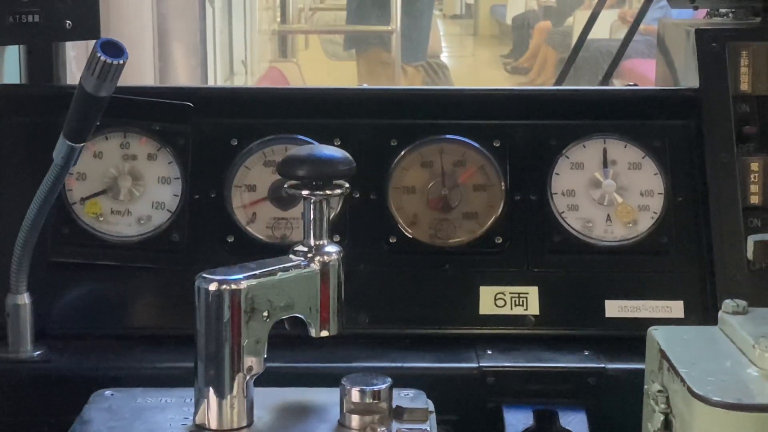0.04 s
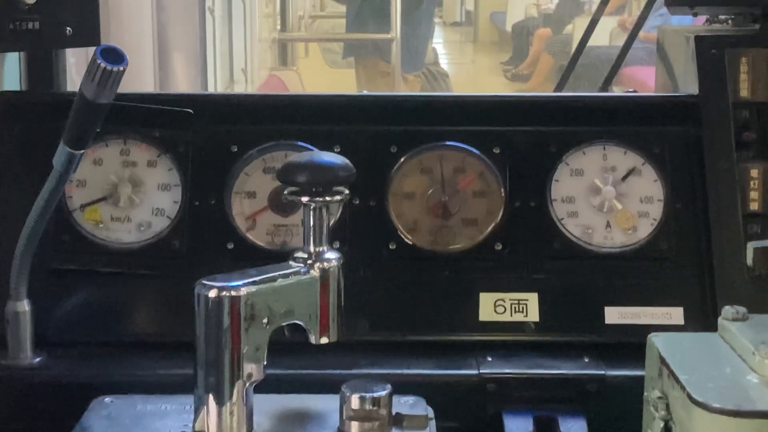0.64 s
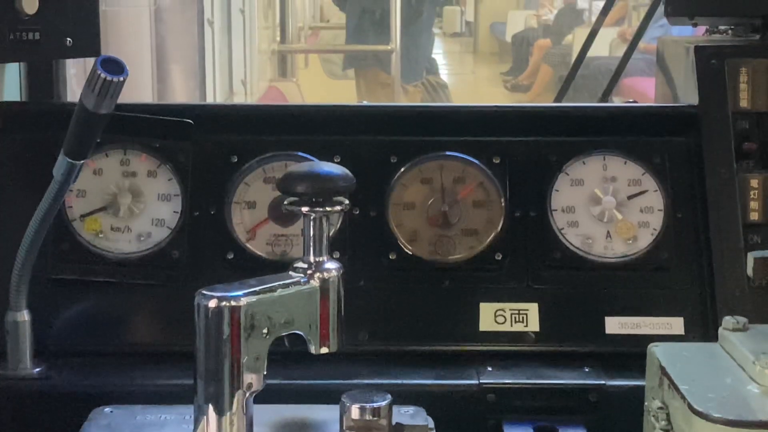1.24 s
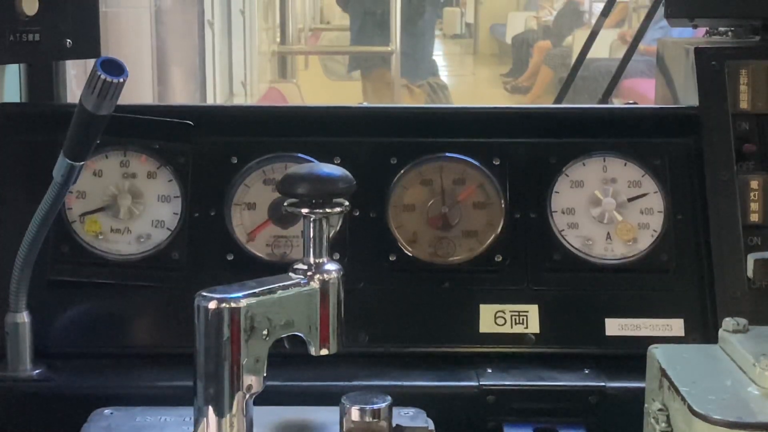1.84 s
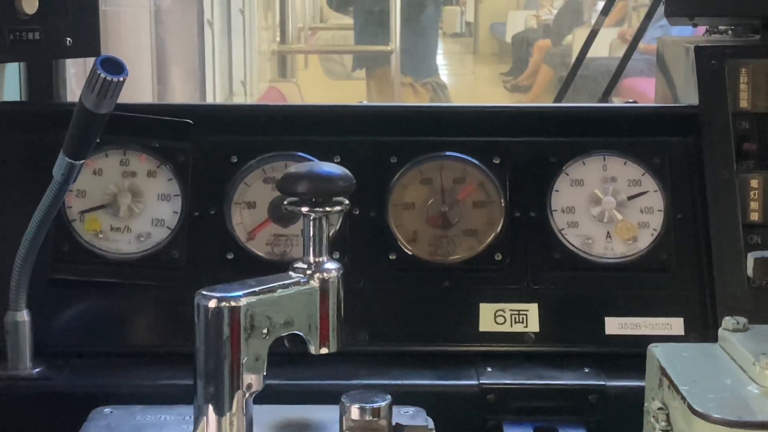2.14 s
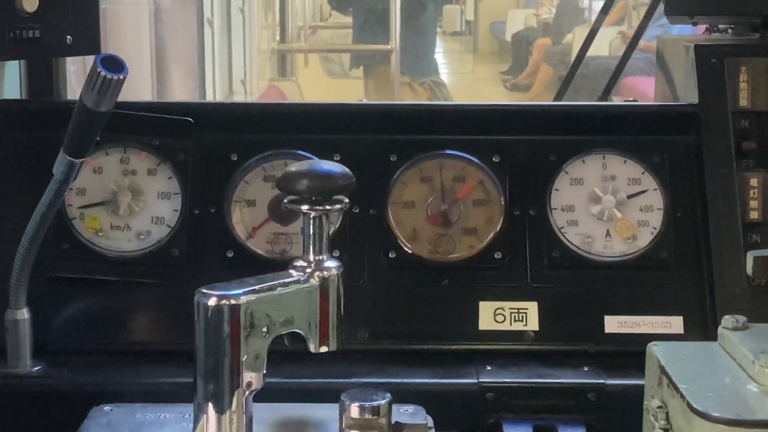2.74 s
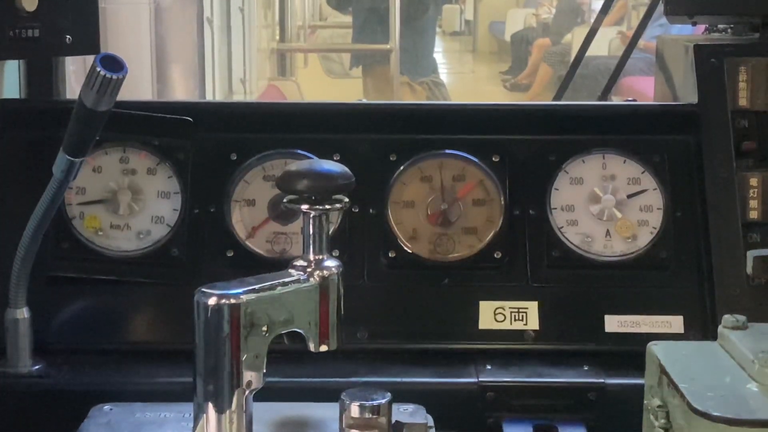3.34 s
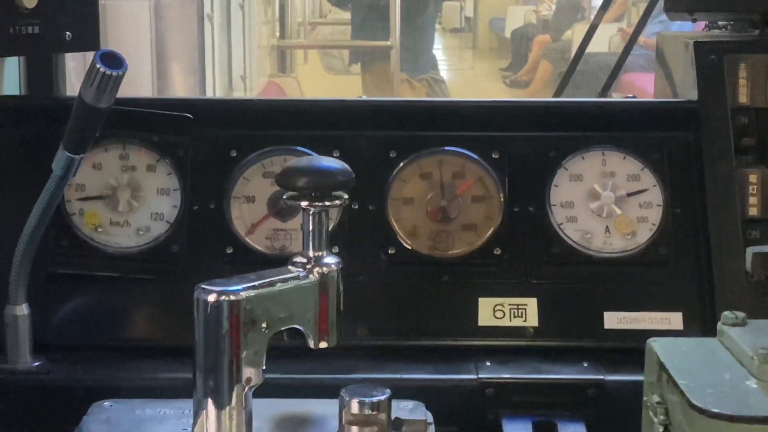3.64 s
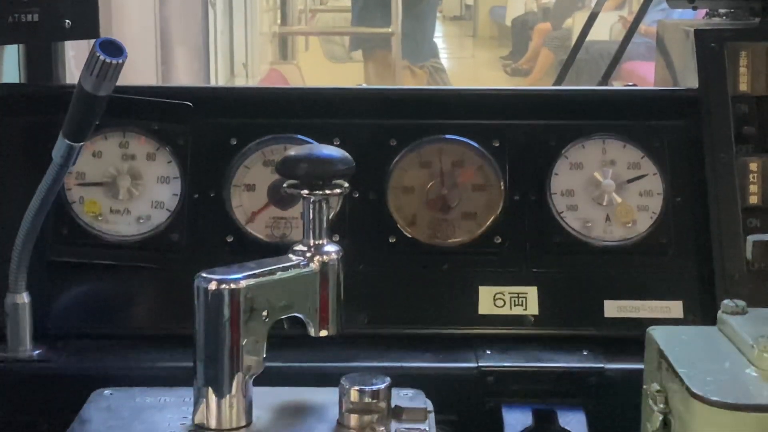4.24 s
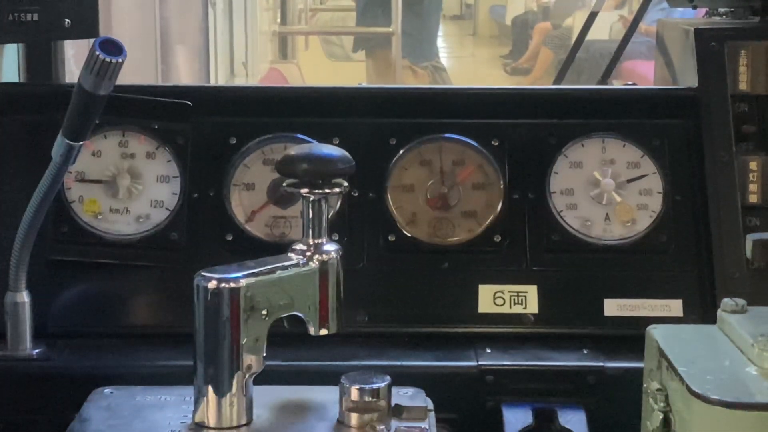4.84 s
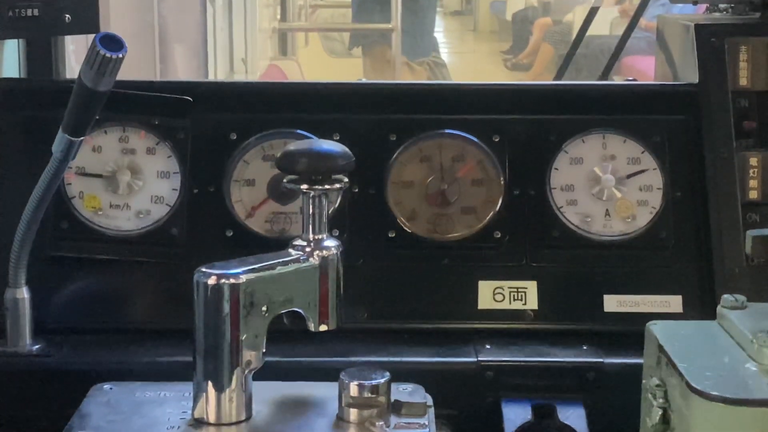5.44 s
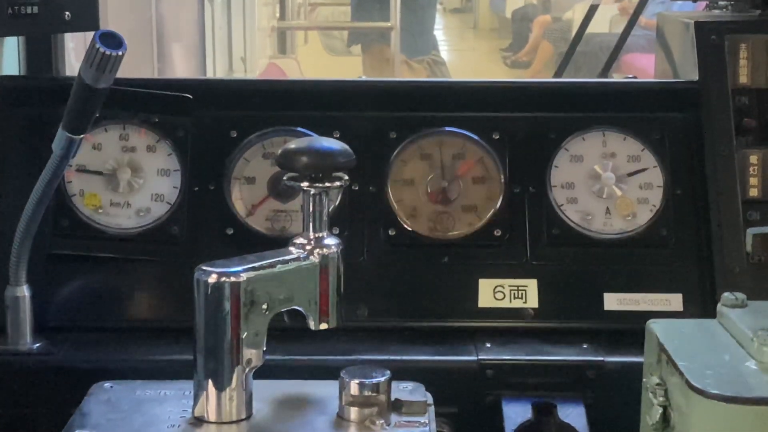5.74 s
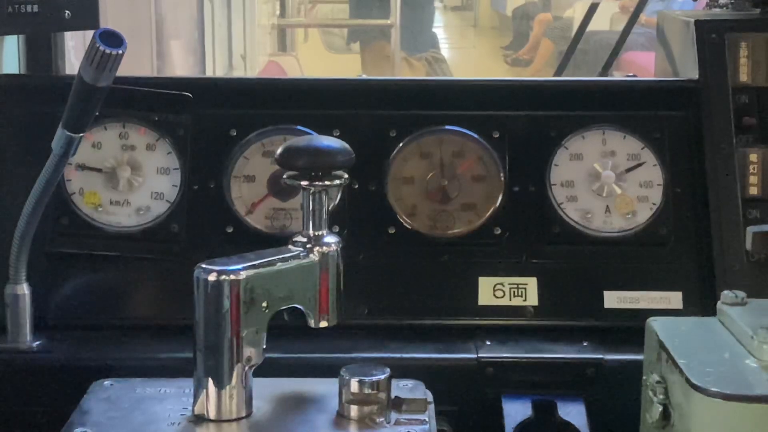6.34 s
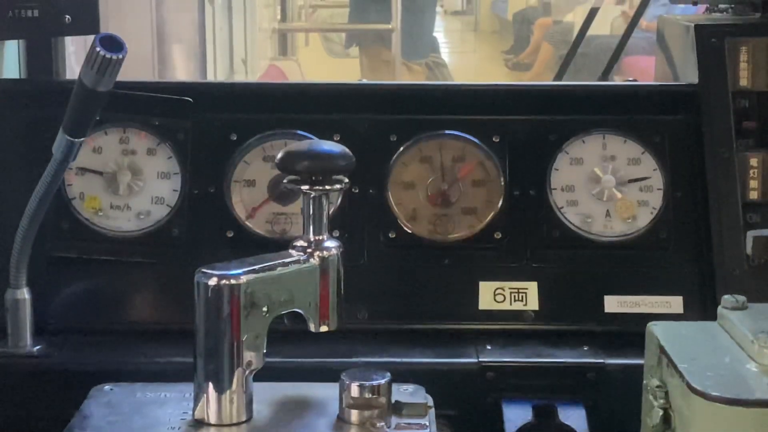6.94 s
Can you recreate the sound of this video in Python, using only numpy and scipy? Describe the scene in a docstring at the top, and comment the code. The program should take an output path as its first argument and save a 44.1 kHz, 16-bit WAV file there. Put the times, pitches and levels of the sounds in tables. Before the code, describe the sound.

An electric train gathers speed, heard inside the driver's cab. A deep rumble, wheel roar, machine hum and thin, nearly steady whine run throughout. At first brake air fades, the control lever clicks and the couplings jolt with low booms and a dull clatter. Later a faint gear note climbs in pitch, wheels knock over rail joints three times, one wheel chirps briefly, and a valve lets out a soft puff of air.

```python
"""In the driver's cab of an electric train that gathers speed.
The body rumbles and the wheels roar under a machine's hum and a thin whine; both sag twice in pitch
with their power supply. Brake air fades, the controller clicks, valves puff and the couplings jolt.
The gears sing a slowly rising note, wheels knock over rail joints and a wheel's rim chirps on the rail."""
import sys
import numpy as np
from scipy import signal
from scipy.fft import rfft, irfft
from scipy.io import wavfile
from scipy.ndimage import uniform_filter1d

SR = 44100
rng = np.random.default_rng(int(sys.argv[2]) if len(sys.argv) > 2 else 0)


def store_wav(level_fs):
    """Save 16-bit WAV to argv[1]."""
    pcm = np.round(np.clip(np.atleast_2d(level_fs), -1, 1) * 32767)
    wavfile.write(sys.argv[1], SR, pcm.T.astype(np.int16))


N = 312669
T = np.arange(N) / SR
HZ = np.fft.rfftfreq(N, 1 / SR)


def amp(db):
    """Turns decibels into a gain to multiply by."""
    return 10 ** (np.asarray(db) / 20)

def unit(x):
    """Scales a signal to an average strength (rms) of one."""
    return x / np.sqrt(np.mean(x ** 2) + 1e-20)

def curve(rows, column=1):
    """Joins the points of a time table with straight lines."""
    rows = np.array(rows, float)
    return np.interp(T, rows[:, 0], rows[:, column])

def shape(points):
    """Joins the points of a frequency table, giving each octave equal room."""
    f, value = np.transpose(points)
    return np.interp(np.log(HZ + 1), np.log(f + 1), value)

def spectrum(points):
    """A gain for each frequency, falling steeply beyond the table's ends."""
    lowest_hz, highest_hz = points[0][0], points[-1][0]
    return amp(shape(points)) / (1 + (HZ / highest_hz) ** 4) / (1 + (lowest_hz / (HZ + 1)) ** 4)

def resonance(hz, width_hz):
    """A peak around a frequency at which something likes to ring."""
    return 1 / (1 + (2 * (HZ - hz) / width_hz) ** 2)

def drift(rate_hz):
    """A smooth random wobble of strength one."""
    return unit(irfft(rfft(rng.standard_normal(N)) / (1 + (HZ / rate_hz) ** 4), N))

def swell(depth_db, rate_hz):
    """A gain that wanders at random."""
    return amp(depth_db * drift(rate_hz))

def burst(start, attack_s, t60, hold_s=0):
    """A gain that rises, holds, then fades by 60 dB in t60 seconds (the fade time)."""
    age = T - start
    rise = np.clip(age / attack_s, 0, 1)
    return rise * np.exp(-np.log(1000) * np.maximum(age - attack_s - hold_s, 0) / t60)

def angle(hz):
    """The growing angle whose sine is a tone of the given pitch."""
    return 2 * np.pi * (np.cumsum(hz) / SR + rng.random())

def steadied(x, share, span_s):
    """Evens out the slow swells of a noise; a share of 1 evens them most."""
    power = uniform_filter1d((x ** 2).mean(0), max(int(span_s * SR), 2))
    return unit(x / uniform_filter1d(power, SR // 50) ** (np.clip(share, 0, 1) / 2))

# sound that reaches both ears together: f/Hz, share
SHARED_SOUND = [(100, 1), (150, 0.92), (210, 0.97), (300, 0.56), (400, 0.57), (520, 0), (750, 0.16),
                (1100, 0)]
# how much of the treble is alike on both sides, a little later on the left: f/Hz, share
LATE_SOUND = [(600, 0), (1200, 0.99), (1600, 0), (2200, 0.73), (3600, 0.15), (5800, 0.031), (7200, 1)]
# how much louder the left side is: f/Hz, level/dB
LEFT_LEAN = [(60, -3.5), (120, 1.5), (230, -1), (440, 1), (850, -0.5), (1650, 1.5), (3200, 3), (6200, 0.5),
             (12000, -0.5)]
def noise(gain):
    """Stereo noise: alike on both sides in the bass; higher up, partly alike, with the left side a little
    behind the right."""
    source, other = rfft(rng.standard_normal((2, N)))
    lag_s = 12 / SR
    alike = shape(SHARED_SOUND) + shape(LATE_SOUND) * np.exp(-2j * np.pi * HZ * lag_s)
    alike = alike / np.maximum(abs(alike) / .995, 1)
    left = alike * source + np.sqrt(1 - abs(alike) ** 2) * other
    lean = amp(shape(LEFT_LEAN) / 2)
    return unit(irfft(np.array([left * lean, source / lean]) * gain, N))


# frequencies that the cab boosts: f/Hz, width/Hz, boost/dB
CAB_RESONANCES = [(66, 8, 3), (94, 7, 6), (124, 6, 3), (176, 12, 3), (198, 14, 3), (277, 12, 4),
                  (303, 16, 3), (343, 16, 4), (366, 20, 3), (400, 22, 4), (468, 28, 5), (520, 24, 3),
                  (702, 22, 4), (745, 30, 3), (808, 20, 3), (915, 50, 3), (1215, 30, 3), (1400, 70, 2),
                  (1555, 50, 3), (2030, 40, 5), (2480, 90, 2), (2740, 70, 3), (2930, 90, 4), (3350, 130, 3),
                  (4050, 160, 2), (4600, 140, 2), (5750, 220, 2), (6520, 120, 3), (7330, 200, 2)]
# tone colours of the body, panels, wheels, their rolling faces and the rails: f/Hz, level/dB
BODY_COLOUR = [(12, -25), (22, -24), (32, -12), (45, -8.5), (57, 0.5), (68, 1.5), (84, -4.5), (98, 0),
               (125, -12.5), (180, -29)]
PANEL_COLOUR = [(90, -11), (112, 3.5), (135, 3), (160, 0), (180, 3), (200, -3), (235, -9), (300, -10),
                (420, -17)]
ROAR_COLOUR = [(150, -5.5), (240, 6), (300, 3.5), (390, 3.5), (450, -1), (560, 0), (720, -1), (800, -6),
               (1000, -7), (1200, -8.5), (1550, -10), (1950, -11), (2250, -25.5), (3500, -65)]
TREAD_COLOUR = [(250, -18.5), (340, 3.5), (480, -2.5), (600, -8.5), (900, -15), (1200, -18.5)]
HISS_COLOUR = [(1400, -7), (2200, 6), (2900, 2), (3200, -0.5), (3700, 0), (4300, -2), (5000, -1.5),
               (5600, -5.5)]
FIZZ_COLOUR = [(6000, 1), (7300, 3.5), (8400, 0), (9600, 2), (11000, -3.5), (12500, -2), (14000, -16.5)]
# loudness of the body's shaking and of the wheels' rolling faces: t/s, level/dB
BODY_LEVELS = [(0, -30), (.3, -28), (.45, -22), (.75, -23), (1.15, -28.5), (1.4, -30), (1.9, -35.5),
               (3.1, -25.5), (3.4, -24), (4.8, -21.5), (5.15, -25.5), (6, -21.5), (6.45, -24), (7.09, -24)]
TREAD_LEVELS = [(0, -41.5), (1.6, -72), (2.4, -34), (3.5, -34), (4.5, -35), (5.8, -36), (7.09, -40.5)]
# loudness along the ride: t/s, panel drone/dB, wheel roar/dB, rail hiss/dB
RIDE_LEVELS = [(0, -29.5, -28.5, -46), (.5, -24, -28.5, -47), (1.3, -27.5, -29, -47),
               (2, -24.5, -29.5, -49), (3.2, -28, -30.5, -48.5), (4.5, -25, -29.5, -47.5),
               (5.3, -25, -30, -47.5), (6.3, -25, -29.5, -46.5), (6.85, -26, -28.5, -47.5),
               (7.09, -21, -28, -45)]
def running_noise():
    """The body rumbles, panels drone, wheels roar and rails hiss, all coloured by the cab."""
    cab = amp(sum(db * resonance(hz, width) for hz, width, db in CAB_RESONANCES))
    drone_db, roar_db, hiss_db = (curve(RIDE_LEVELS, column) for column in (1, 2, 3))
    rumble = steadied(noise(spectrum(BODY_COLOUR) * cab), share=.75, span_s=.13)
    rumble *= amp(curve(BODY_LEVELS)) * swell(depth_db=1.56, rate_hz=3.5)
    drone = steadied(noise(spectrum(PANEL_COLOUR) * cab), share=1, span_s=.25)
    drone *= amp(drone_db) * swell(.2, 5.3)
    roar_flutter, hiss_flutter = swell(.6, 12), swell(.5, 20)
    roar = noise(spectrum(ROAR_COLOUR) * cab) * amp(roar_db) * roar_flutter
    tread = noise(spectrum(TREAD_COLOUR) * cab) * amp(curve(TREAD_LEVELS)) * swell(1, 6.8)
    hiss = noise(spectrum(HISS_COLOUR) * cab) * amp(hiss_db) * hiss_flutter
    fizz = noise(spectrum(FIZZ_COLOUR) * cab) * amp(hiss_db - 12) * swell(.8, 14)
    return rumble + drone + roar + tread + hiss + fizz

# notes of the pipe that lets out the brake air: f/Hz, width/Hz, level/dB
PIPE_RESONANCES = [(2030, 160, 8), (3350, 200, -2), (4000, 260, 1), (4430, 280, -1), (5750, 300, -7),
                   (6530, 150, -4), (8800, 700, -12)]
def brake_air():
    """Air whistles out through a pipe and dies away."""
    pipe = noise(sum(amp(db) * resonance(hz, width) for hz, width, db in PIPE_RESONANCES))
    return amp(-51.5) * burst(0, attack_s=1 / SR, t60=1.6, hold_s=.39) * pipe

# puffs of air: t/s, level/dB, rise time/s, fade time/s
VALVE_PUFFS = [(1.17, -52, .17, 0.99), (6.655, -45, 0.018, 0.57)]
# tone colour of escaping air: f/Hz, level/dB
AIR_COLOUR = [(2000, -11), (3200, 12), (4500, 7), (7500, -1.5), (11500, -3), (15000, -22)]
def valves():
    """Twice a valve lets out a little hissing air."""
    flow = sum(amp(db) * burst(start, attack, t60) for start, db, attack, t60 in VALVE_PUFFS)
    return noise(spectrum(AIR_COLOUR)) * flow

# the short tones that make up a click: f/Hz, level/dB, fade time/s
CLICK_TONES = [(2890, 4, .015), (3800, 1, .01), (5300, -9, .007), (6850, -11, .006), (8800, -10, .006),
               (11900, -6, .0076), (14700, -6, .007)]
def controller():
    """The driver's lever clicks into a notch, a little to the right."""
    age = np.maximum(T - .4283, 0)
    click = sum(amp(db - 60 * age / t60) * np.sin(2 * np.pi * hz * age) for hz, db, t60 in CLICK_TONES)
    return amp(-33) * click * amp([[-1.5], [1.5]])

# steady tones of fans and electrics: f/Hz, width/Hz, level/dB
FAN_TONES = [(76.5, 4, -33), (152, 5, -41), (300.7, 8, -45), (361, 4, -38), (600, 3, -50), (664, 6, -52),
             (866, 4, -55), (1083, 6, -61)]
# tone from the ripple in the motors' current: t/s, level/dB
RIPPLE_LEVELS = [(0, -65), (.75, -38), (1.7, -44.5), (2.3, -38), (2.8, -36.5), (3.1, -47), (4.5, -40.5),
                 (5.1, -49.5), (7.09, -41.5)]
def fans_and_motors():
    """Fans and motors buzz at pitches that stay put, each a narrow band of noise."""
    fans = sum(amp(db) * steadied(noise(resonance(hz, width) ** 2), share=.61, span_s=.26)
               for hz, width, db in FAN_TONES)
    ripple = steadied(noise(resonance(hz=722, width_hz=9.6)), share=.56, span_s=.19)
    return fans + amp(curve(RIPPLE_LEVELS)) * ripple

# pitch of the whine, sagging and recovering with the power supply: t/s, f/Hz
WHINE_PITCH = [(0, 1783), (.28, 1782), (.4, 1770), (.7, 1761), (.9, 1771), (1.3, 1781), (1.7, 1776),
               (3.2, 1775.5), (3.6, 1773), (4.15, 1779), (5.15, 1775), (6.05, 1777), (6.33, 1755),
               (6.55, 1748), (6.77, 1757), (7.09, 1781)]
# swells and brief dips of the whine: t/s, level/dB
WHINE_LEVELS = [(0, -.3), (.29, 0), (.355, -7), (.41, 1), (.47, 1), (.52, -5), (.6, -.5), (.73, -2),
                (.82, -5), (.91, 1), (1.2, -1.5), (1.4, .7), (2.1, .8), (2.3, -2.5), (2.5, -3.5),
                (2.65, -1), (2.8, 1.8), (3.3, -.7), (3.4, -3.5), (3.52, 1.3), (3.93, -.7), (4.05, 1.7),
                (4.3, 1.5), (4.65, -.3), (5.06, 1), (5.12, -4), (5.27, -.7), (5.45, -1.3), (6.05, 0),
                (6.15, -1), (6.4, 0), (6.78, .5), (6.9, -1.5), (7.09, -2.5)]
# the cab's pattern of loud and quiet spots (a standing wave): f/Hz, left/dB, right/dB, left lead/rad
STANDING_WAVE = [(1748, -34, -35, -1.1), (1762, -39, -39, 1.6), (1766, -41, -41, 2.3),
                 (1773, -35, -34.5, 3.8), (1776, -35, -37, 4.2), (1780, -32.5, -42, 4.3),
                 (1783, -31.5, -37.5, 5.3)]
def whine():
    """A thin tone, rougher after each jolt; its pitch moves the loud and quiet spots in the cab."""
    hz = curve(WHINE_PITCH)
    pitches, *columns = np.transpose(STANDING_WAVE)
    left_db, right_db, lead = (np.interp(hz, pitches, column) for column in columns)
    turn = angle(hz) + .12 * drift(25)
    shake = np.max([burst(start, JOLT_RISE_S, t60=1.1) for start, *_ in COUPLING_JOLTS], axis=0)
    # the wave between the two sides wanders slowly
    left = amp(left_db) * swell(.95, 15) * np.sin(turn + lead + .2 * drift(5))
    right = amp(right_db) * swell(.95, 15) * np.sin(turn)
    # the shaking cab scatters a little of the tone
    scatter = np.array([drift(50) * np.sin(turn) + drift(50) * np.cos(turn) for side in range(2)])
    level = amp(curve(WHINE_LEVELS)) * swell(depth_db=2.2 * shake, rate_hz=34)
    return level * (np.sqrt(2) * np.array([left, right]) + amp(-51) * (1 + 2 * shake) * scatter)

def shaft_speed():
    """Turns per second: the heavy shaft follows the same supply dips as the whine, but late."""
    normal_shaft_hz, normal_whine_hz, lag_s = 57.8, 1776, .29
    sag = curve(WHINE_PITCH) / normal_whine_hz - 1
    memory = np.exp(-1 / (lag_s * SR))
    return normal_shaft_hz * (1 + signal.lfilter([1 - memory], [1, -memory], sag))

# the main hum, at twice the shaft speed: t/s, level/dB
HUM_LEVELS = [(0, -25), (.5, -26.5), (1.05, -25), (1.3, -29.5), (1.8, -23), (2.25, -25), (2.8, -19),
              (3.8, -25), (4.15, -26.5), (4.8, -27.5), (5.1, -22.5), (5.55, -29), (5.8, -18.5),
              (6.1, -21.5), (6.35, -15), (7.09, -25.5)]
# weaker tones of the shaft: multiple of its speed, start level/dB, end level/dB
SHAFT_TONES = [(1, -43, -33), (3, -34.5, -37), (4, -50, -55)]
def machine_hum():
    """A spinning helper machine shakes the cab at multiples of its shaft speed."""
    turn = angle(shaft_speed())
    hum = amp(curve(HUM_LEVELS)) * swell(.66, 5.8) * np.sin(2 * turn + .13 * drift(3.1))
    for multiple, start_db, end_db in SHAFT_TONES:
        level = amp(np.linspace(start_db, end_db, N)) * swell(2.5, 8.7)
        hum += level * np.sin(multiple * turn + .54 * drift(4.4))
    return np.sqrt(2) * hum * amp([[-.5], [.5]])

# notes of a wheel: f/Hz, width/Hz, level/dB
WHEEL_RESONANCES = [(1570, 220, 11), (2900, 500, -4.5)]
def wheel_ring():
    """A wheel rings when it is shaken at random."""
    return noise(sum(amp(db) * resonance(hz, width) for hz, width, db in WHEEL_RESONANCES))

# slips of the wheel's guiding rim (the flange): t/s, level/dB, hold time/s, f/Hz
FLANGE_SLIPS = [(4.45, -48, 0.12, 1535), (4.581, -34, .025, 1502), (4.634, -41, 0.044, 1536)]
def flange_chirp():
    """The rim rasps along the rail, shakes the wheel and briefly catches in a wavering squeal."""
    rasp, squeal = np.zeros((2, N))
    for start, db, hold_s, hz in FLANGE_SLIPS:
        rub = amp(db) * burst(start, attack_s=.0093, t60=.23, hold_s=hold_s)
        turn = angle(hz + 22.1 * drift(60))
        rasp = np.maximum(rasp, rub)
        squeal += rub * (np.sin(turn) + amp(-11) * np.sin(2 * turn))
    return wheel_ring() * rasp + amp(-1.5) * squeal

# wheels hitting joints in the rail: t/s, clank/dB, thud/dB, clank fade time/s
JOINT_HITS = [(3.539, -36.5, -46, 0.27), (3.571, -47.5, -40, 0.3), (4.425, -38.5, -34, 0.71),
              (4.593, -40, -17, 0.32), (6.455, -42, -27, .3), (6.483, -24, -28, 0.25),
              (6.535, -40, -34, .26), (6.61, -52, -19.5, 0.3)]
# tone colours of the clank and the thud: f/Hz, level/dB
CLANK_COLOUR = [(150, -10), (240, 5), (310, 13), (420, -1), (624, 1), (750, -2), (900, 1.5), (1060, 1),
                (1250, -2.5), (1560, 3), (1800, -1.5), (2010, 0), (2200, -10), (2750, -9.5), (2900, -7.5),
                (3100, -14), (3380, -13.5), (3700, -19), (4300, -21.5), (6000, -31), (10000, -45)]
THUD_COLOUR = [(24, -13), (40, -14), (62, 3), (85, -9), (140, 1), (300, -40), (800, -57)]
# notes of loose parts on the frame that holds the wheels: f/Hz, width/Hz, boost/dB
FRAME_RESONANCES = [(1620, 60, 4), (2010, 50, 3), (2540, 60, 3), (2930, 70, 4)]
def rail_joints():
    """A wheel drops into a joint with a dull thud; it rings, and its frame clanks and rattles on."""
    rise_s = .018
    clank, thud = np.zeros((2, N))
    for start, clank_db, thud_db, t60 in JOINT_HITS:
        lingering = amp(-8) * burst(start, rise_s, t60=.67)
        clank += amp(clank_db) * (burst(start, rise_s, t60) + lingering)
        thud += amp(thud_db) * burst(start, rise_s, t60=.48)
    frame = amp(sum(db * resonance(hz, width) for hz, width, db in FRAME_RESONANCES))
    rattle = noise(spectrum(CLANK_COLOUR) * frame) * swell(depth_db=1.8, rate_hz=70)
    metal = rattle + amp(-7) * wheel_ring()
    bass = steadied(noise(spectrum(THUD_COLOUR)), share=.98, span_s=.023)
    return clank * metal + thud * bass

JOLT_RISE_S = .02
# jolts of the links between cars: t/s, clatter/dB, boom/dB, boom f/Hz, clatter fade time/s
COUPLING_JOLTS = [(.385, -58, -21, 89, .3), (.53, -31.5, -14.5, 58, 0.36), (.64, -40, -11.5, 66, .79),
                  (.72, -36, -19, 62, .7), (.85, -56, -18.5, 72, .5), (.92, -44, -23, 44, .4),
                  (1.085, -42, -22.5, 105, .25), (1.14, -54, -16, 58, .3)]
# tone colour of their dull clatter: f/Hz, level/dB
CLATTER_COLOUR = [(300, -15), (600, 2), (850, -4), (1150, 2), (1450, -7), (1900, -6), (2300, -16),
                  (3000, -14.5), (5000, -32)]
def couplings():
    """As the motors start to pull, the links between the cars clatter and the body booms."""
    clatter, boom = np.zeros((2, N))
    for start, clatter_db, boom_db, hz, t60 in COUPLING_JOLTS:
        clatter += amp(clatter_db) * burst(start, JOLT_RISE_S, t60)
        body_tone = np.sin(angle(hz + 3 * drift(8.9)))
        boom += amp(boom_db) * burst(start, attack_s=.057, t60=.5) * body_tone
    return clatter * noise(spectrum(CLATTER_COLOUR)) * swell(depth_db=1.5, rate_hz=56) + boom

# pitch of the gear teeth meeting, rising with the speed: t/s, f/Hz
GEAR_PITCH = [(0, 90), (3.5, 245), (4.3, 305), (4.75, 345), (5.1, 375), (5.45, 398), (5.65, 417), (6, 444),
              (6.45, 470), (7.09, 515)]
# moments when the car rings along with the gears: t/s, length/s, level/dB
GEAR_SWELLS = [(4.3, .18, -34), (4.76, .18, -31.5), (5.11, .16, -31), (5.45, .26, -34.5), (5.7, .26, -34),
               (5.97, .18, -36)]
def gears():
    """The gear teeth sing a climbing note that swells and fades on its way up."""
    turn = angle(curve(GEAR_PITCH)) + .4 * drift(7)
    note = np.array([swell(2, 14) * np.sin(turn + .4 * drift(12)) for side in range(2)])
    swells = sum(amp(db) * np.exp(-(2 * (T - peak) / length) ** 2) for peak, length, db in GEAR_SWELLS)
    return np.sqrt(2) * (amp(-45) + swells) * note


def scene():
    """Everything that is heard in the cab: the lasting sounds plus the short ones."""
    lasting = running_noise() + machine_hum() + whine() + fans_and_motors() + gears()
    return lasting + couplings() + rail_joints() + flange_chirp() + brake_air() + valves() + controller()

def record(dry):
    """Cuts away the very highest treble."""
    cutoff_hz = 15700
    low_pass = signal.firwin(511, cutoff_hz, window=("kaiser", 9), fs=SR)
    return signal.oaconvolve(dry, low_pass[None], "same")


dry = scene()
out = record(dry)
store_wav(out)
```